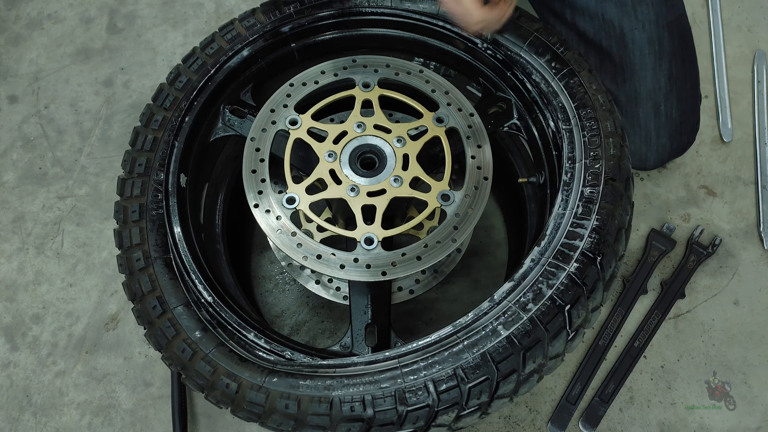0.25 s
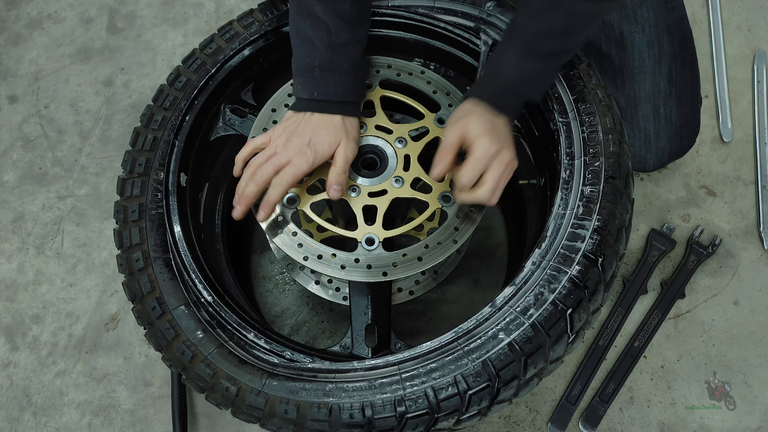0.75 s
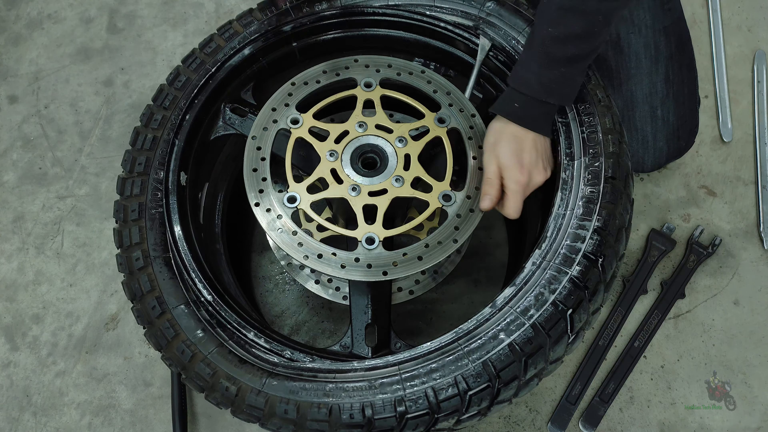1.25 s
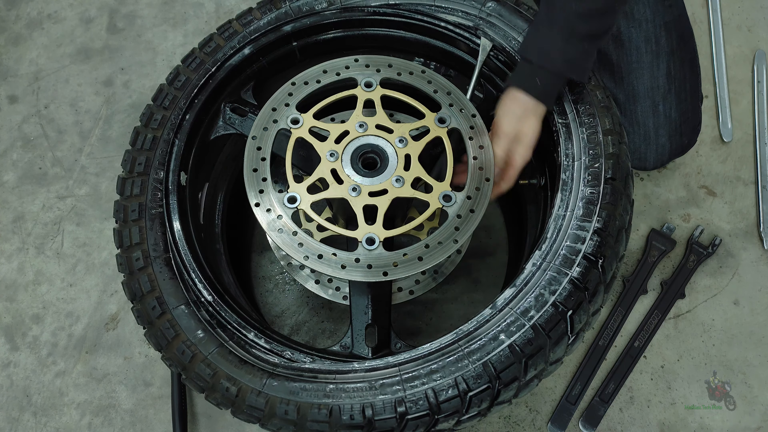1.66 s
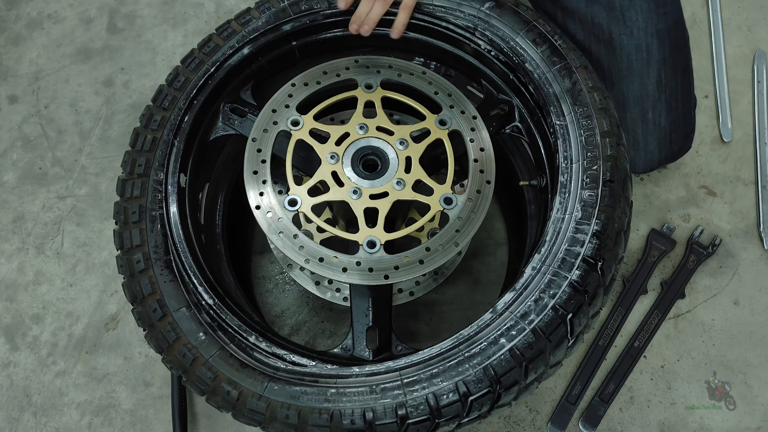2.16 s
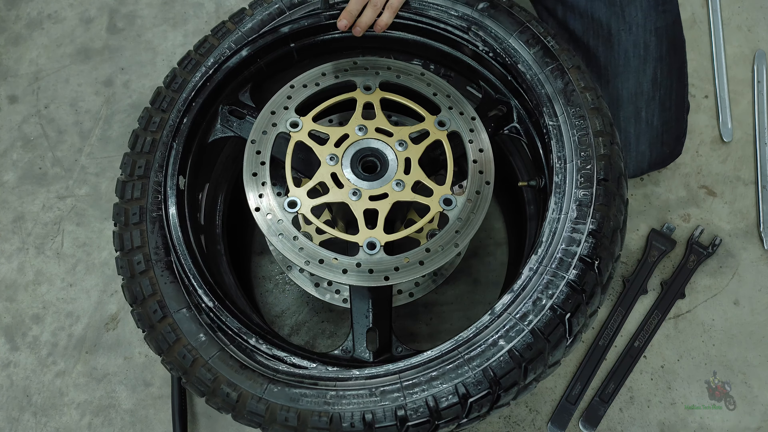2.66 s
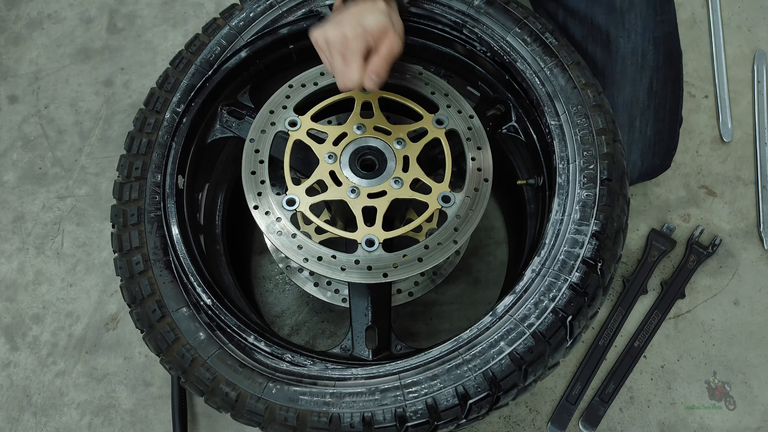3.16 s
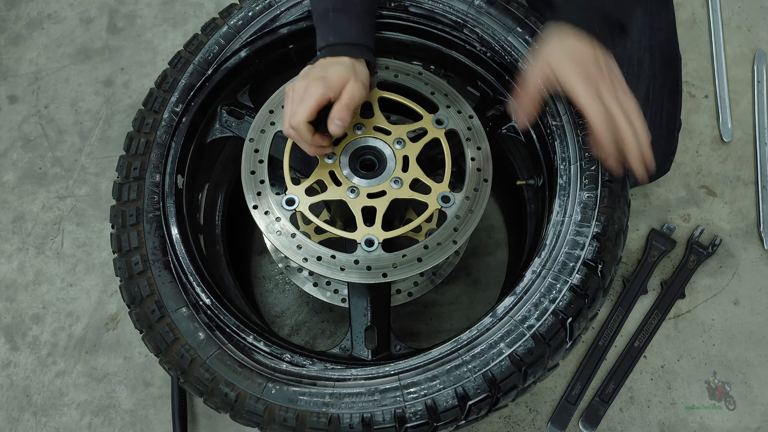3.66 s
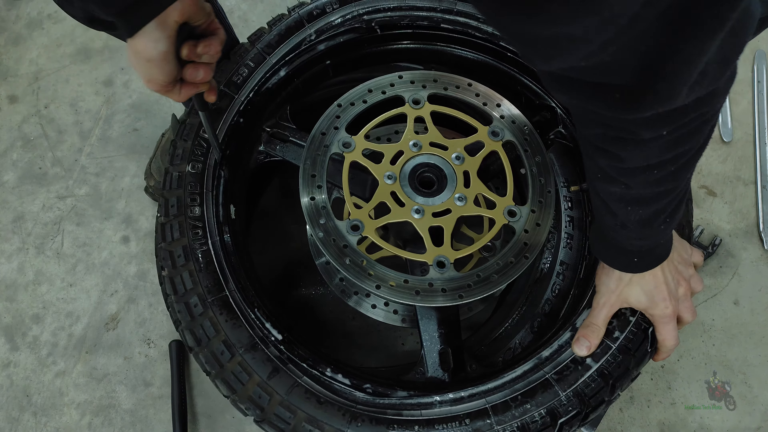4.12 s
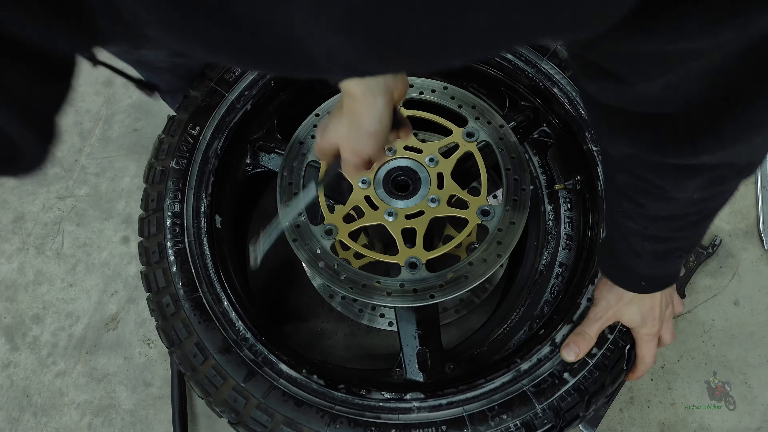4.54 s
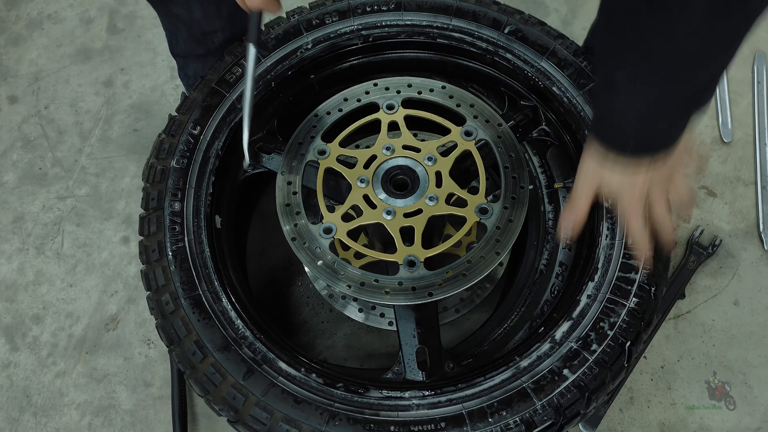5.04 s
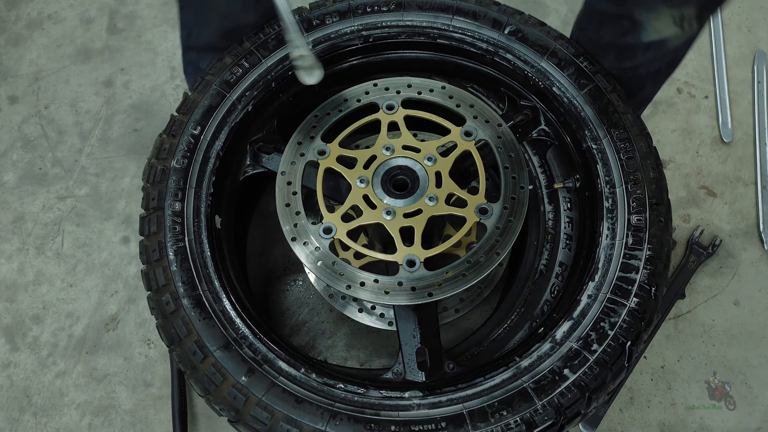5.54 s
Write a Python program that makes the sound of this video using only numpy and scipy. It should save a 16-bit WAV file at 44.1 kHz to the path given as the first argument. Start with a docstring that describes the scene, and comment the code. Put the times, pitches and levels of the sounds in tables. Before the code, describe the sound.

Hands and a metal lever thump, drag and clack on a hollow motorcycle wheel and tyre, with a brief brake-disc ring in a reverberant garage.

```python
"""Tyre work on a motorcycle wheel

Hands and levers thump the hollow wheel, modelled as damped modes with a low boom of the tyre's air.
Clinks are dying noise bursts; the brake disc is a bank of beating mode pairs; a low jolt meets the floor.
Rubber drag and scraping are noise shaped by strokes; squeaks are sliding tones. A hard room reverberates
through decaying noise, over a changing thin hiss, steady background noise and, later, a low hum."""
import sys
import numpy as np
from scipy import signal
from scipy.fft import rfft, irfft, next_fast_len
from scipy.io import wavfile
from scipy.ndimage import uniform_filter1d

SR = 44100
rng = np.random.default_rng(int(sys.argv[2]) if len(sys.argv) > 2 else 0)


def store_pcm(level_fs):
    """Save levels as 16-bit WAV."""
    pcm = np.round(np.clip(level_fs, -1, 1) * 32767).astype(np.int16)
    wavfile.write(sys.argv[1], SR, np.atleast_2d(pcm).T)


N = 255328   # samples

# Steady background spectrum: f/Hz, level per Hz/dB
BACKGROUND_SPECTRUM = [(12, -55), (20, 1), (60, 3), (234, 0), (527, -3), (1220, -9), (4810, -24),
                       (6720, -33.5), (7730, -45), (12100, -22), (16000, -13)]
BACKGROUND_DB = -66.5
# Thin hiss in the top treble: t/s, level/dB
HISS_LEVEL = [(0.0, -90), (0.09, -65.5), (0.66, -84), (1.13, -71.5), (1.55, -73), (2.24, -75.5),
              (2.35, -76), (3.39, -72), (4.13, -81.5), (4.27, -90), (4.43, -78), (4.59, -86.5),
              (4.77, -111), (5.31, -65), (5.5, -68), (5.79, -47.5)]
# Rubber drags on rim and floor: t at full level/s, rise/s, hold/s, fall T60/s, level/dB, centre f/Hz,
# narrowing/(dB per octave squared), amplitude of the broad rumble [ratio]
DRAG_STROKES = [(.01, 0.06, 0.017, 0.88, -50, 453, 43, .5), (.4, 0.16, 0.0087, 0.15, -52.5, 477, 46, 0.28),
                (.6, 0.16, 0.0098, 0.31, -53, 398, 47, .32), (.87, .04, 0.19, 0.71, -43, 362, 301, 0.11),
                (1.035, .03, .02, .2, -44, 650, 150, .1), (1.075, 0.04, 0.085, 0.24, -41, 560, 150, 0.11),
                (1.36, 0.1, 0.093, 0.48, -45, 400, 40, 0.44), (1.4, 0.11, .2, .5, -42, 550, 120, 0.14),
                (2.1, 0.19, 0.17, 1.14, -57.5, 350, 45, 0.45),
                (2.71, 0.046, 0.11, 0.24, -42, 650, 100, .05),
                (3.13, .1, 0.008, 0.32, -29.5, 440, 44, 0.34), (4.3, 0.025, 0.14, 0.15, -31, 430, 15, 0.36),
                (4.5, 0.044, 0.13, 0.74, -40.5, 484, 48, 0.36), (5.3, 0.14, 0.38, 0.87, -61, 289, 20, 2.9)]
DRAG_REST_DB, JUDDER_DB = -110, 3.5   # level between strokes; unevenness of the rubber's grip
# Modes of the wheel's air and rubber: f/Hz, level/dB, free T60/s
WHEEL_MODES = [(237.4, -10.5, 0.52), (337, -5.5, 0.98), (363.5, 1, 0.83), (441.1, -5.5, 0.41),
               (475, -1.5, 0.18), (491.5, -5, 0.97), (530, -1.5, 0.97), (563, 2, 0.55), (631, -4.5, 0.79),
               (670.3, -2.5, 0.75), (820, -3, 0.54), (952, -2, 0.29)]
BOOM_HZ, BOOM_T60_S = 157.9, 0.14   # free air resonance inside the tyre
# Scraping and clatter: t at full level/s, rise/s, hold/s, fall T60/s, level/dB, centre f/Hz,
# share sounding through the hollow [0-1]
SCRAPE_STROKES = [(.06, 0.15, 0.015, 0.51, -46, 1610, .03), (.2, 0.042, 0.0071, 0.44, -53, 7000, 0.3),
                  (.56, 0.065, 0.0078, 0.23, -55.5, 6800, .01), (1.125, .06, 0.024, 0.15, -56, 1110, .05),
                  (1.32, 0.054, .16, 0.6, -38.5, 2290, .85), (2.13, 0.055, 0.045, 0.78, -59, 6600, 0.04),
                  (2.53, 0.068, 0.17, 0.2, -58, 6200, 0.15), (3.093, 0.035, 0.06, 0.5, -41, 2300, 0.25),
                  (3.745, 0.0069, 0.049, 0.19, -45, 5000, 0.3), (4.3, 0.067, 0.17, 0.17, -39.5, 1700, 0),
                  (4.48, 0.13, 0.18, 0.81, -43, 3300, 0.11), (5.21, 0.017, 0.21, 0.47, -55, 6900, 0.15),
                  (5.445, 0.053, 0.044, 0.32, -39.5, 4720, 0.1),
                  (5.55, 0.044, 0.27, 0.44, -49.5, 6700, 0.1), (5.74, 0.16, 0.0063, 0.35, -40, 6150, 0.1)]
SCRAPE_REST_DB = -75   # faint shuffling between strokes
# Basic scrape spectrum: f/Hz, level per Hz/dB
SCRAPE_SPECTRUM = [(600, 2.5), (1200, 0), (2500, 4), (4500, -1.5), (6800, 2), (9500, -7), (13000, -22)]
# Resonances of the hollow under the wheel: f/Hz, width/Hz, level/dB
HOLLOW_MODES = [(1560, 330, 0), (2400, 330, -3), (2900, 620, -6), (4050, 1400, -5), (5760, 1360, -1),
                (6700, 1000, -6)]
# Balance of scrapes, squeaks and clinks: t/s, left minus right level/dB
RIM_PAN = [(0, -1.5), (2.4, -3), (3.2, -3.5), (4.6, -0.5), (5.5, -6), (5.79, -1)]
# Squeaks of steel on rubber and rim: t/s, hold/s, fall T60/s, level before wavering/dB, start f/Hz,
# slide/(octaves per s)
SQUEAK_TONES = [(0, 0.056, 0.22, -53, 1142, 0), (0, .04, .2, -53, 2470, 0.5),
                (.06, .04, .2, -51, 1600, -.5), (.065, .06, .3, -54, 1952, 0.1),
                (.066, 0.07, .15, -54, 4300, -1), (.058, .015, .12, -48, 950, -.1),
                (0, .06, .2, -58, 2950, -.1), (2.118, .12, 0.24, -64.5, 6760, 0.3),
                (2.751, .008, .1, -48, 6500, 1), (3.741, .06, .25, -46, 2660, -0.8),
                (3.751, .05, 0.21, -54, 3325, 0.1), (3.741, 0.045, .2, -56, 5770, -.1),
                (3.74, 0.057, 0.17, -54.5, 6310, 0.1), (5.64, .02, 0.14, -53, 1554, 0.2)]
SQUEAK_WAVER_PER_S = 330
# Clinks and snaps: t/s, peak level before the crack/dB, centre f/Hz, decay T60/s,
# treble crack level relative to that peak/dB
CLINK_EVENTS = [(0.0586, -25, 1470, 0.088, -22), (0.0655, -31, 4400, 0.05, -1), (0.162, -37, 7000, 0.14, 3),
                (0.8103, -31, 1150, 0.039, -37), (1.2996, -15, 1650, 0.065, -7),
                (1.948, -55, 1620, 0.023, -12), (2.116, -49.5, 6450, 0.064, 8.5),
                (2.256, -43.5, 1790, 0.088, -4), (2.277, -32, 1100, 0.022, -27),
                (2.64, -42.5, 3460, 0.025, -1), (2.6894, -28, 925, 0.013, -1.5),
                (2.9263, -45.5, 2070, 0.14, -1.5), (3.0898, -38, 2740, 0.13, 10.5),
                (3.608, -45, 1000, 0.079, -15), (3.7433, -33.5, 2820, 0.042, -1),
                (4.225, -43, 2740, 0.074, -3), (4.275, -31, 2950, 0.24, -15),
                (4.291, -18, 1620, 0.04, -7.5), (4.319, -23, 5930, 0.041, -8),
                (4.4675, -26.5, 5600, 0.05, 14), (5.091, -53, 1290, 0.018, -28),
                (5.64, -33.5, 1410, 0.14, -35)]
# Thumps: t/s, peak level before boom and onset/dB, centre f of the push/Hz, ring time factor [ratio],
# tyre boom level relative to that peak/dB
THUMP_EVENTS = [(0.065, -30, 328, 0.27, -22.5), (0.22, -34.5, 536, 0.2, -22), (0.376, -42, 484, 0.22, -9.5),
                (0.429, -40.5, 520, 0.24, -34), (0.562, -38.5, 338, 0.23, -9.5),
                (0.649, -31.5, 330, 0.13, -14), (0.81, -11.5, 371, 0.21, -13.5),
                (0.8105, -15.5, 625, 0.16, -41), (1.299, -9.5, 560, 0.14, -30),
                (1.359, -14.5, 540, 0.16, -26), (1.419, -20, 587, 0.51, -62),
                (1.446, -21.5, 536, 0.26, -50), (1.947, -43, 524, 0.077, -43),
                (2.071, -42.5, 298, 0.31, -6), (2.259, -25, 379, 0.24, -25), (2.276, -18.5, 530, 0.19, -34),
                (2.513, -39, 453, 0.14, -40), (2.641, -29, 441, 0.69, -19), (2.690, -6, 666, 0.1, -59),
                (2.927, -32, 395, 0.41, -12), (3.083, -24.5, 480, 0.39, -17),
                (3.113, -20.5, 386, 0.23, -19), (3.154, -17.5, 505, 0.17, -18), (3.611, -23, 363, 0.7, -20),
                (3.612, -30, 650, 0.2, -39.5), (4.295, -11, 458, 0.2, -60.5), (4.321, -10, 618, 0.13, -18),
                (4.339, -5, 278, 0.092, -20.5), (4.413, -14, 516, 0.23, -18),
                (4.451, -16.5, 430, 0.3, -58.5), (5.637, -32, 372, 0.25, -22.5)]
KNOCK_T60_S = 0.28   # the push's own tone, before the ring time factor
# Reverberation time: f/Hz, T60/s
ROOM_DECAY = [(100, 0.26), (500, 0.77), (2500, 0.75), (6000, 0.53), (12000, 0.13)]
# What each source sends to the walls, relative to its own level
CLINK_ROOM_DB, THUMP_ROOM_DB, DISC_ROOM_DB, SCRAPE_ROOM_DB, DRAG_ROOM_DB = -6, -11.5, -8, -13, -18
RING_STOPS_S, STOP_DB_PER_S = 3.733, 1500   # thumps and reverberation begun earlier break off here
# Fingers and a lever rattle on the disc: t at full level/s, rise/s, hold/s, fall T60/s,
# drive level/dB, lift of the low modes/dB
DISC_RATTLES = [(.535, 0.01, 0.04, 0.05, -88, -19.5), (.813, 0.005, 0.016, 0.08, -87, -8),
                (.97, 0.1, .08, .2, -98, -18), (1.075, 0.02, 0.075, 0.08, -92, 4)]
# Disc modes, lower of each pair: f/Hz
DISC_MODE_HZ = [1104, 1180, 1778, 1858, 2760, 3430, 3628, 4554, 5624, 6766, 8032, 9340, 10800, 12310, 13885,
                15555]
# For each disc mode: struck level/dB, rattled level/dB, free T60/s
DISC_MODES = [(-8, 4, 0.9), (-20, 6, 0.4), (-20, 7, 0.5), (-20, 6, 0.6), (-13, -5, 0.9), (-12, -24, 1.0),
              (-10, -9, 0.9), (-9, -11, 1.2), (4, 3.5, 1.2), (5, 3.5, 1.1), (-4, -18, 0.4), (2, 1, 0.45),
              (-4, 0, 0.2), (3, -12, 0.2), (0, -12, 0.25), (4, -10, .25)]
DISC_STRIKE_S, DISC_STRIKE_DB = 4.470, -39
TAP_DB = 26   # a tap this far above the drive marks each rattle's full level
HAND_DAMPING = 0.25   # ring time left while a hand rests on the disc [ratio]
PAIR_SPLIT = 0.0021   # relative frequency gap within each mode pair
WAVER_PER_S, WAVER_DEPTH = 100, 1.0   # fast random level wavering roughens the disc's ring
DISC_STILLED_S, STILLING_DB_PER_S = 4.9, 110   # late in its ring the disc is smothered
HUM_HZ, HUM_FROM_S, HUM_DB = 77.6, 3.7, -74.5
JOLT_S, JOLT_DB, JOLT_HZ, JOLT_T60_S = 4.337, -25.5, 64.4, 0.041   # the wheel drops onto the floor
RISE_DEPTH_DB = 30   # a stroke climbs this far during its rise
SHARED_BELOW_HZ = 720   # the microphone ports hear nearly the same below this
PORT_EDGE_HZ, PORT_TREBLE_DB = 7450, -9   # the microphone loses treble above a sharp edge
CUTOFF_HZ = 16100


def from_db(db):
    """Amplitude is ten to the power of level over twenty."""
    return 10 ** (np.asarray(db) / 20)


def rms_one(x):
    """Division by the root mean square normalises signal power."""
    return x / np.sqrt(np.mean(x ** 2) + 1e-20)


def in_time(rows):
    """Linear interpolation joins the tabulated times."""
    s, *columns = np.transpose(rows)
    return [np.interp(np.arange(N) / SR, s, c, left=c[0], right=c[-1]) for c in columns]


def at_hz(points, hz):
    """Interpolation is linear along a logarithmic frequency axis."""
    points = np.array(points)
    return np.interp(np.log(hz), np.log(points[:, 0]), points[:, 1])


def highpass(x, order, hz):
    """A Butterworth high-pass attenuates below its corner frequency."""
    return signal.sosfilt(signal.butter(order, hz, "high", fs=SR, output="sos"), x)


def band(x, low_hz, high_hz):
    """A Butterworth band-pass keeps the energy between two frequencies."""
    edges = [low_hz, min(high_hz, 0.45 * SR)]
    return signal.sosfilt(signal.butter(2, edges, "band", fs=SR, output="sos"), x)


def ring(x, hz, t60):
    """A two-pole resonator answers a unit click with a decaying sine of initial height 1."""
    r, w = from_db(-60 / (t60 * SR)), 2 * np.pi * hz / SR
    return signal.lfilter([0, np.sin(w)], [1, -2 * r * np.cos(w), r * r], x + 1e-18)


def two_ports(length):
    """Port coherence falls with frequency: noise is nearly alike in the bass, unrelated in the treble."""
    mid, side = rng.standard_normal((2, length))
    side = highpass(side, 1, SHARED_BELOW_HZ) + 0.13 * side
    return np.array([mid + side, mid - side])


def panned(x, pan_db):
    """A level difference between the ports places a source."""
    return x * from_db(np.array([pan_db / 2, -pan_db / 2]))


def add(out, s, x):
    """Superposition adds an event at its time."""
    at = round(s * SR)
    out[..., at:at + x.shape[-1]] += x[..., :N - at]


def drift(rate):
    """Interpolated normal deviates form a random fluctuation, with rate knots per second."""
    knots = rng.standard_normal(round(N / SR * rate) + 2)
    return np.interp(np.arange(N) / SR * rate, np.arange(len(knots)), knots)


def strokes(rows, rest_db):
    """Stroke powers add; the other columns are averages weighted by power, so the strongest prevails."""
    t = np.arange(0, N + 64, 64) / SR
    s, rise, hold, t60, db, *columns = np.transpose(rows)[:, :, None]
    rising = RISE_DEPTH_DB * np.maximum(s - t, 0) / np.maximum(rise, 0.005)
    falling = 60 * np.maximum(t - s - hold, 0) / np.maximum(t60, 0.02)
    power = from_db(np.maximum(db - rising - falling, -300)) ** 2
    total = power.sum(axis=0)
    level_db = 10 * np.log10(total + from_db(rest_db) ** 2)
    means = [(power * c).sum(axis=0) / total for c in columns]
    return [np.interp(np.arange(N) / SR, t, c) for c in [level_db, *means]]


def levelled(x, window):
    """Division by a running root mean square keeps short-term power constant."""
    return x / np.sqrt(uniform_filter1d(np.mean(x ** 2, axis=0), size=window))


def above_boom(x):
    """A steep high-pass removes energy beneath the tyre's air resonance."""
    return highpass(x, 5, 125)


def hollowed(x):
    """Parallel cavity resonances colour the sound; each is steep so that the valleys stay dark."""
    out = 0
    for hz, width, db in HOLLOW_MODES:
        edges = hz - width / 2, hz + width / 2
        out = out + from_db(db) * band(band(x, *edges), *edges)
    return out


def background():
    """Spectral weighting of white noise gives the steady noise of the room and the microphone."""
    weight = from_db(at_hz(BACKGROUND_SPECTRUM, np.fft.rfftfreq(N, 1 / SR) + 1))
    return from_db(BACKGROUND_DB) * rms_one(irfft(rfft(two_ports(N)) * weight, N))


def treble_hiss():
    """Amplitude modulation makes band-limited noise swell and flicker."""
    level_db = in_time(HISS_LEVEL)[0] + 0.87 * drift(22)
    return from_db(level_db) * rms_one(band(two_ports(N), 11260, 18000))


def wheel_drag(level_db, centre_hz, narrowing_db, rumble):
    """Uneven rubber friction drives damped wheel modes near a moving centre."""
    ports = two_ports(N)
    judder = (ports + ports.mean(axis=0)) * from_db(JUDDER_DB * drift(55))
    out = np.abs(rumble) * rms_one(band(band(judder, 230, 1030), 230, 1030))
    for hz, db, t60 in WHEEL_MODES:
        near_db = -np.abs(narrowing_db) * np.log2(hz / centre_hz) ** 2 + 3 * drift(6)
        out = out + from_db(db + near_db) * rms_one(ring(judder, hz, 0.55 * t60))
    boom = rms_one(ring(judder, BOOM_HZ, BOOM_T60_S / 2))
    out = out + from_db(-19.5 + 3.75 * drift(11.0)) * boom
    return from_db(level_db) * above_boom(levelled(out, 3500))


def scrape(level_db, centre_hz, share):
    """Gritty friction is clicks in noise, its third-octave bands lifted round a moving centre."""
    share = np.clip(share, 0, 1)
    click_db = 4.8 * np.minimum(rng.exponential(1, N), 3)
    grit = 1 + (rng.random(N) < 900 / SR) * from_db(click_db)   # about 900 clicks per second
    white = [two_ports(N) * grit, two_ports(N) * grit]   # neighbouring bands use different noise
    out, edges = 0, 600 * 2 ** np.arange(0, 4.4, 1 / 3)
    for k, (low, high) in enumerate(zip(edges, edges[1:])):
        hz = np.sqrt(low * high)
        lift_db = 9 * np.exp(-(np.log2(hz / centre_hz) / 0.31) ** 2)
        flicker_db = (3.5 - 1.5 * share) * drift(20)
        gain = from_db(at_hz(SCRAPE_SPECTRUM, hz) + lift_db + flicker_db)
        out = out + gain * band(white[k % 2], low, high)
    out = (1 - share) * rms_one(out) + share * rms_one(hollowed(out))
    return from_db(level_db) * levelled(out, 4410)


def squeaks():
    """Random quadrature modulation makes sliding tones waver fast, unlike at each port."""
    out, t = np.zeros((2, N)), np.arange(SR // 2) / SR
    for s, hold, t60, db, start_hz, slide in SQUEAK_TONES:
        sliding_hz = start_hz * 2 ** (slide * np.minimum(t, hold + 0.02))
        phase = 2 * np.pi * np.cumsum(sliding_hz) / SR
        knots = rng.standard_normal((2, 2, round(SQUEAK_WAVER_PER_S / 2) + 2))
        waver = [[np.interp(t * SQUEAK_WAVER_PER_S, np.arange(len(k)), k) for k in port] for port in knots]
        tone = np.array([(0.4 + a) * np.sin(phase) + b * np.cos(phase) for a, b in waver])
        fall_db = -60 * np.maximum(t - hold, 0) / max(t60, 0.02)
        onset = 1 - np.exp(-t / 0.0024)
        add(out, s, from_db(db + fall_db) * onset * tone)
    return out


def clinks():
    """Impact noise decays through cavity resonances, with a treble crack. Returns direct, room feed."""
    direct, feed, t = np.zeros((2, N)), np.zeros(N), np.arange(SR // 3) / SR
    for s, peak_db, centre_hz, t60, crack_db in CLINK_EVENTS:
        t60 = max(t60, 0.004)
        burst = two_ports(len(t)) * from_db(-60 * t / t60) * (1 - np.exp(-t / 0.002))
        body = band(burst, centre_hz / 1.53, centre_hz * 1.28) + 0.4 * hollowed(burst) + 0.021 * burst
        body = from_db(peak_db) * body / np.abs(body).max()
        crack = band(burst * from_db(-30 * t / t60), 6140, 22400)   # dies faster than the body
        crack = from_db(peak_db + crack_db) * crack / np.abs(crack).max()
        add(direct, s, body + crack)
        add(feed, s, from_db(CLINK_ROOM_DB) * hollowed(body[0]))   # the walls hear it through the hollow
    return direct, feed


def thumps():
    """A short push excites wheel modes near its centre frequency. Returns direct, room feed."""
    direct, feed, t = np.zeros(N), np.zeros(N), np.arange(SR // 2) / SR
    hz, mode_db, t60 = np.transpose(WHEEL_MODES)[:, :, None]
    for s, peak_db, centre_hz, damp, boom_db in THUMP_EVENTS:
        damp = max(damp, 0.03)
        near_db = -18 * np.log2(hz / centre_hz) ** 2 + rng.normal(0, 1.7, hz.shape)
        # each thump detunes every mode slightly at random
        detuned_hz = hz * (1 + 0.0125 * rng.standard_normal(hz.shape))
        rings = from_db(mode_db + near_db - 60 * t / (t60 * damp)) * np.sin(2 * np.pi * detuned_hz * t)
        knock = 1.36 * from_db(-60 * t / (KNOCK_T60_S * damp)) * np.sin(2 * np.pi * centre_hz * t)
        # each mode's ring throbs at its own random rate, which roughens it
        throb = 1 + 0.45 * np.sin(2 * np.pi * rng.uniform(8, 30, hz.shape) * t)
        body = (rings * throb).sum(axis=0) / 2 + knock
        boom = from_db(boom_db - 60 * t / BOOM_T60_S) * np.sin(2 * np.pi * BOOM_HZ * t)
        onset = 1 - np.exp(-(t / 0.0025) ** 2)
        thump = from_db(peak_db) * (body / np.abs(body).max() + boom) * onset
        add(direct, s, thump)
        add(feed, s, from_db(THUMP_ROOM_DB) * thump)
    clock = np.arange(N) / SR - RING_STOPS_S
    # the direct sound breaks off; the gate reopens 0.4 s later
    direct = direct * np.where(clock < 0.4, from_db(-STOP_DB_PER_S * np.clip(clock, 0, 0.1)), 1)
    return panned(above_boom(direct)[None], np.array([1.5])), above_boom(feed)


def workshop(feed):
    """Reverberation is convolution with noise whose decay time depends on the octave."""
    t, edges = np.arange(round(1.2 * SR)) / SR, 80 * 2.0 ** np.arange(9)
    white, tail = two_ports(len(t)), 0
    for low, high in zip(edges, edges[1:]):
        t60 = at_hz(ROOM_DECAY, np.sqrt(low * high))
        tail = tail + band(white, low, high) * from_db(-60 * t / t60)
    tail = tail * (1 - np.exp(-t / 0.0015))
    size = next_fast_len(N + len(t))
    walls = rfft(tail / np.sqrt(np.sum(tail ** 2) / 2), size)
    late = np.arange(N) > RING_STOPS_S * SR
    early, after = (irfft(rfft(feed * part, size) * walls, size)[:, :N] for part in (~late, late))
    return early * from_db(-STOP_DB_PER_S * np.maximum(np.arange(N) / SR - RING_STOPS_S, 0)) + after


def disc():
    """Close mode pairs of the floating disc beat and waver when struck or rattled, unlike at each port."""
    drive_db, low_db = strokes(DISC_RATTLES, -150)
    rattle = from_db(drive_db + 0.77 * drift(45.75)) * rng.standard_normal(N)
    for s, _, _, _, db, _ in DISC_RATTLES:
        rattle[round(s * SR)] = from_db(db + TAP_DB)
    strike, out = np.zeros(N), np.zeros((2, N))
    strike[round(DISC_STRIKE_S * SR)] = from_db(DISC_STRIKE_DB)
    for hz, (struck_db, rattled_db, t60) in zip(DISC_MODE_HZ, DISC_MODES):
        struck = from_db(struck_db) * strike
        rubbed = rattle * from_db(rattled_db + (low_db if hz < 5000 else 0))
        pair = hz, hz * (1 + PAIR_SPLIT)
        one, other = (ring(struck, f, t60) + ring(rubbed, f, HAND_DAMPING * t60) for f in pair)
        waver = 1 + WAVER_DEPTH * np.array([drift(WAVER_PER_S), drift(WAVER_PER_S)])
        out += waver * np.array([0.5 * one + 0.18 * other, one + 0.4 * other])
    return out * from_db(-STILLING_DB_PER_S * np.maximum(np.arange(N) / SR - DISC_STILLED_S, 0))


def hum():
    """Noise driving one low resonance becomes a wavering hum."""
    resonance = rms_one(ring(rng.standard_normal(N), HUM_HZ, 0.6))
    return from_db(HUM_DB) * resonance * (np.arange(N) > HUM_FROM_S * SR)


def jolt():
    """An impact on the floor is a strongly damped low oscillation."""
    out, t = np.zeros(N), np.arange(SR // 8) / SR
    add(out, JOLT_S, from_db(JOLT_DB - 60 * t / JOLT_T60_S) * np.sin(2 * np.pi * JOLT_HZ * t))
    return out


def port_colour(x):
    """A steep low-pass beside a weak treble path makes the response fall by a step."""
    steep = signal.sosfilt(signal.cheby2(12, 40, PORT_EDGE_HZ, fs=SR, output="sos"), x)
    return steep + from_db(PORT_TREBLE_DB) * highpass(x, 6, 8300)


def scene():
    """Superposition joins the direct sources, their reverberation and the noise beds."""
    drag = wheel_drag(*strokes(DRAG_STROKES, DRAG_REST_DB))
    scraping = scrape(*strokes(SCRAPE_STROKES, SCRAPE_REST_DB)) + squeaks()
    clink, clink_feed = clinks()
    thump, thump_feed = thumps()
    ringing = disc()
    at_rim = panned(scraping + clink, in_time(RIM_PAN)[0])
    feed = thump_feed + clink_feed + from_db(DISC_ROOM_DB) * ringing[1]
    feed = feed + from_db(SCRAPE_ROOM_DB) * scraping[0] + from_db(DRAG_ROOM_DB) * drag[0]
    coloured = port_colour(thump + at_rim + ringing + drag + workshop(feed) + jolt())
    return coloured + treble_hiss() + hum() + background()


def record(dry):
    """A steep low-pass limits the bandwidth."""
    return signal.sosfilt(signal.cheby2(12, 60, CUTOFF_HZ, fs=SR, output="sos"), dry)


dry = scene()
out = record(dry)
store_pcm(out)
```